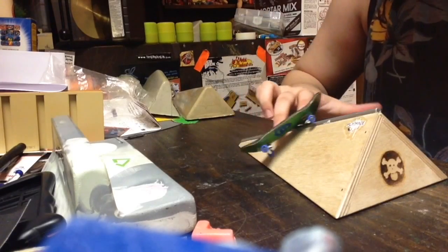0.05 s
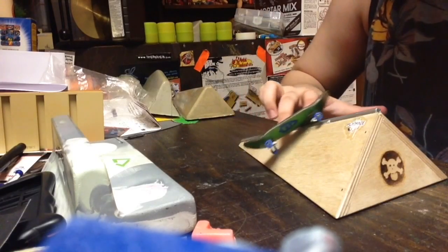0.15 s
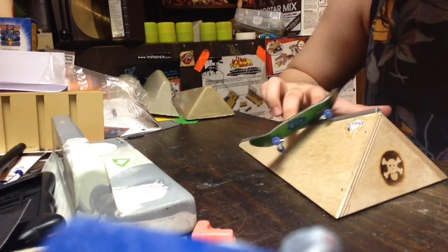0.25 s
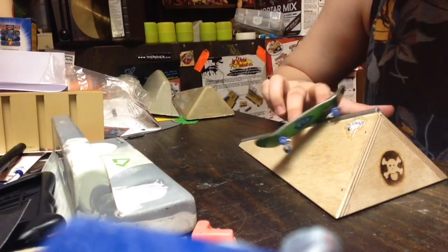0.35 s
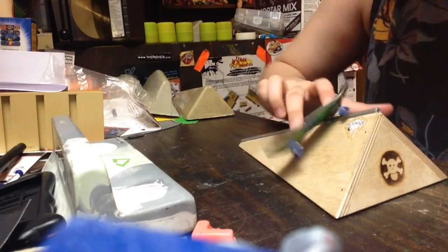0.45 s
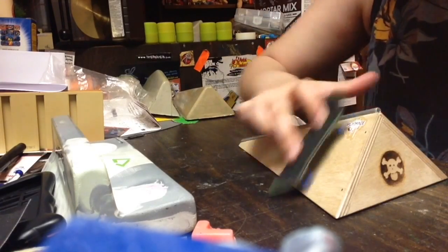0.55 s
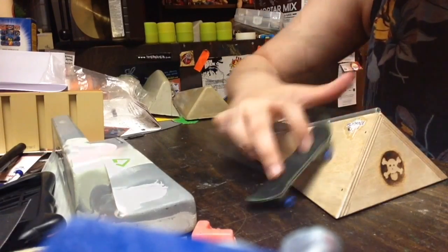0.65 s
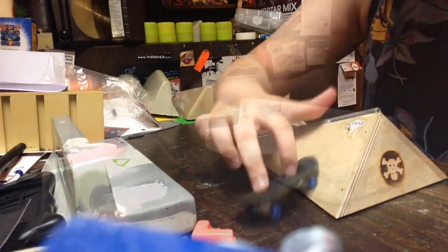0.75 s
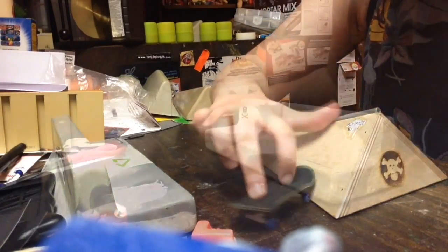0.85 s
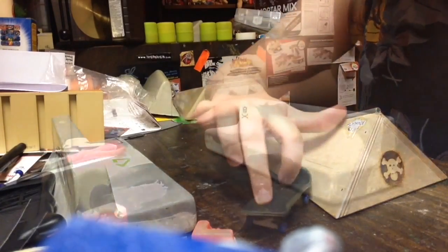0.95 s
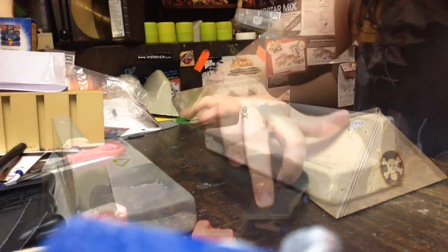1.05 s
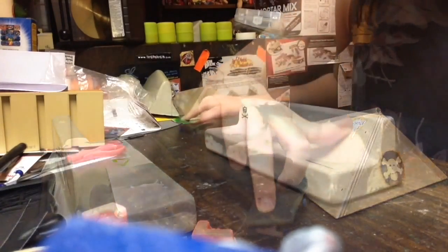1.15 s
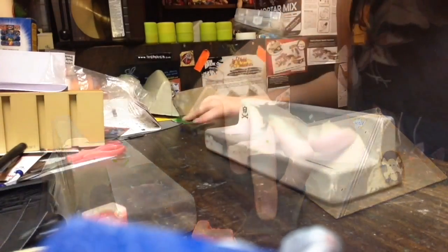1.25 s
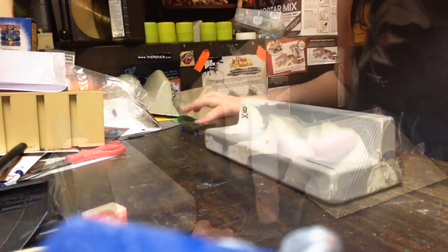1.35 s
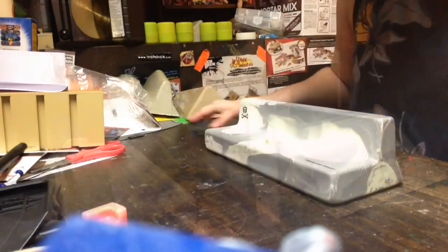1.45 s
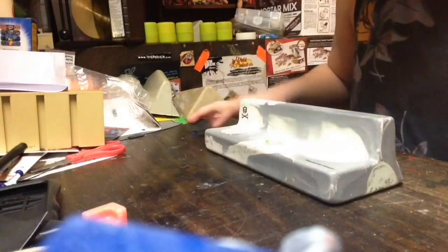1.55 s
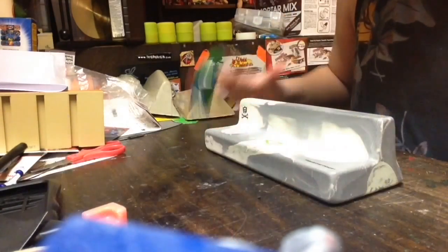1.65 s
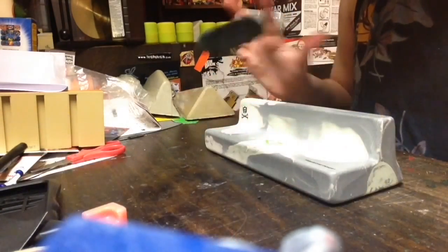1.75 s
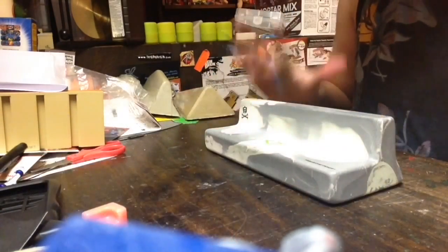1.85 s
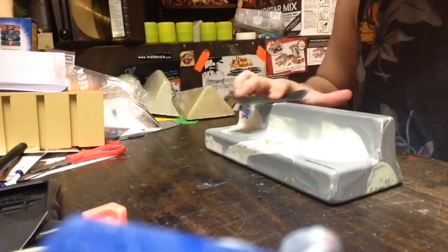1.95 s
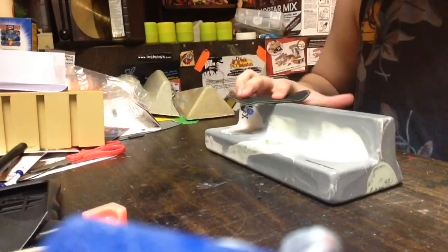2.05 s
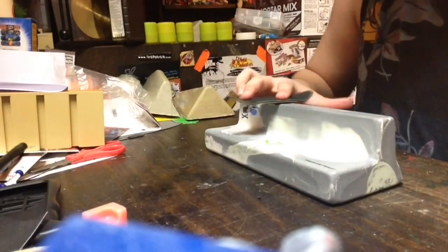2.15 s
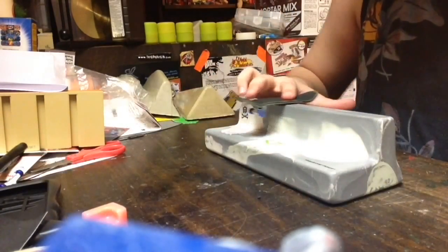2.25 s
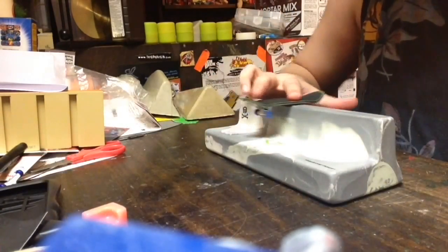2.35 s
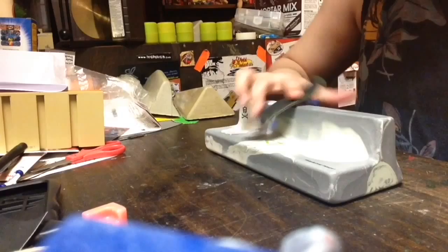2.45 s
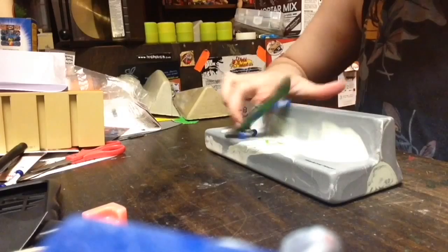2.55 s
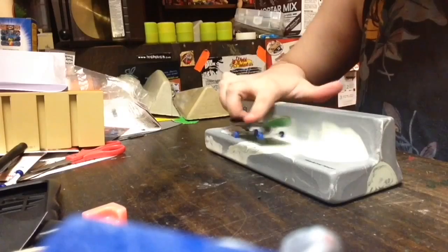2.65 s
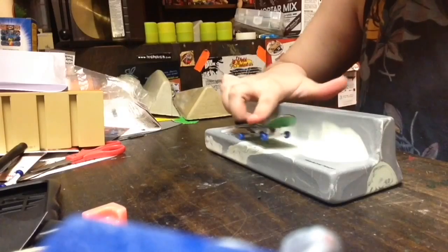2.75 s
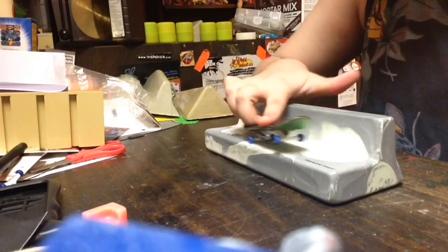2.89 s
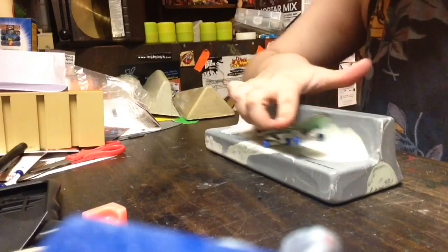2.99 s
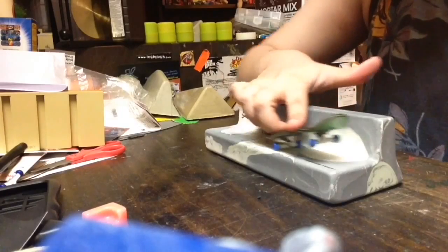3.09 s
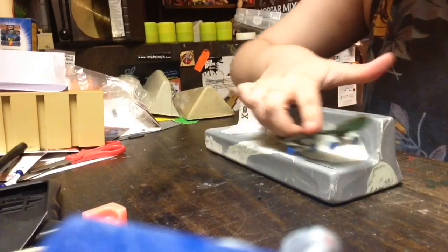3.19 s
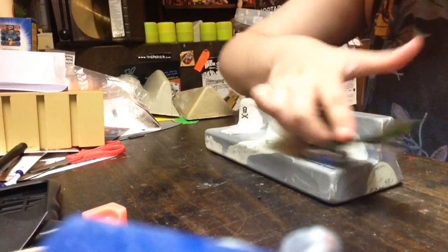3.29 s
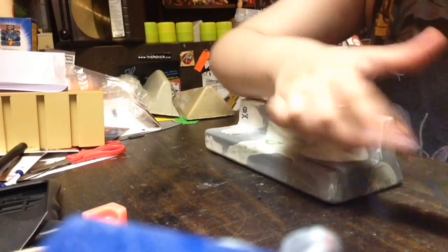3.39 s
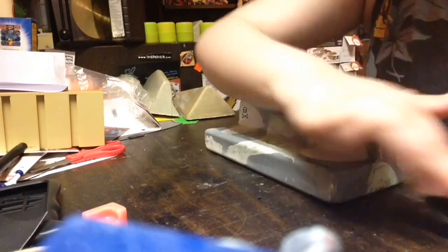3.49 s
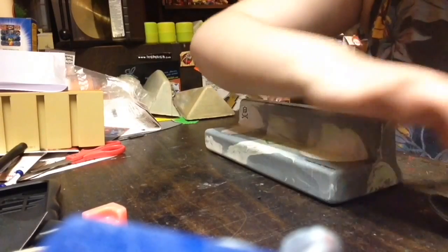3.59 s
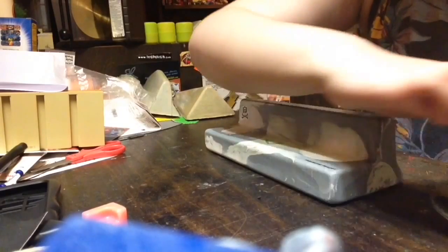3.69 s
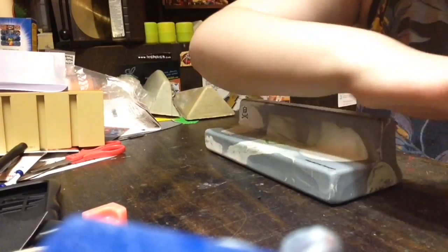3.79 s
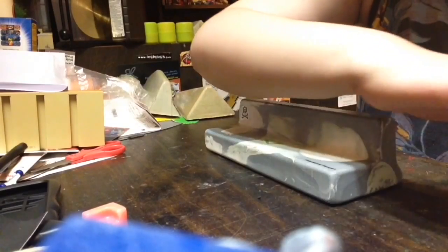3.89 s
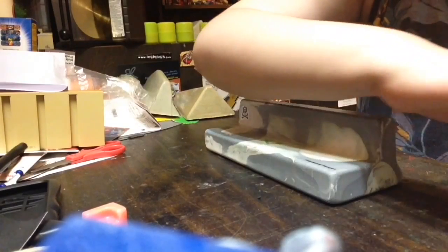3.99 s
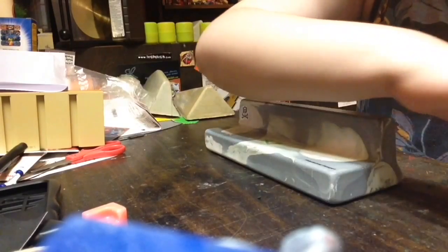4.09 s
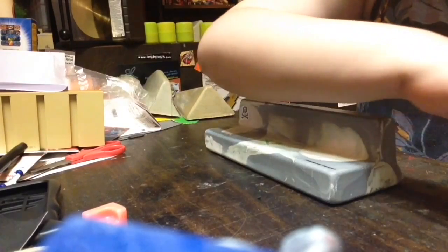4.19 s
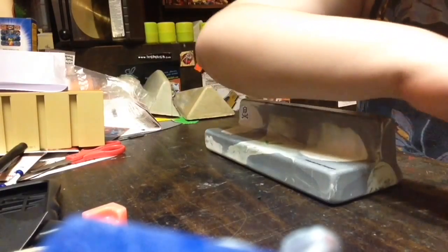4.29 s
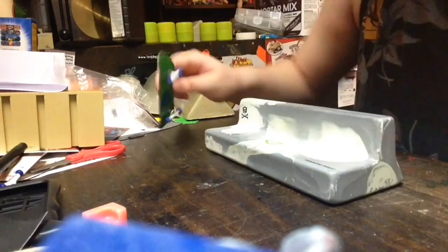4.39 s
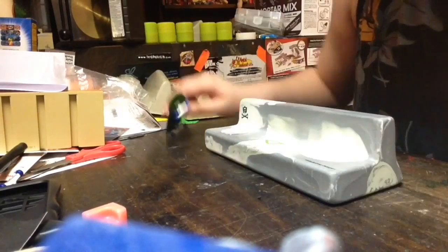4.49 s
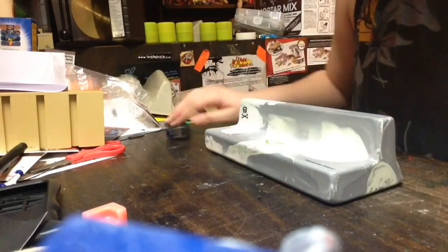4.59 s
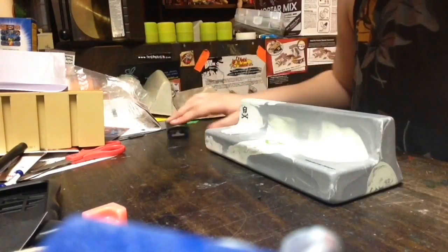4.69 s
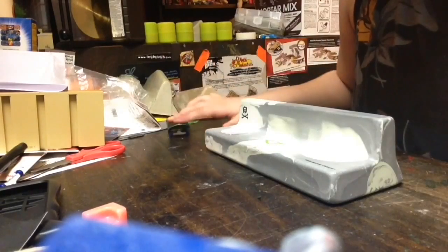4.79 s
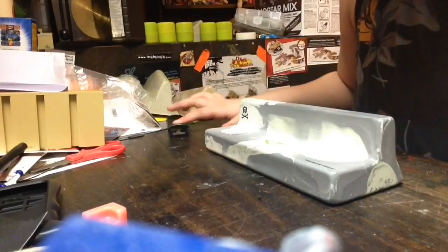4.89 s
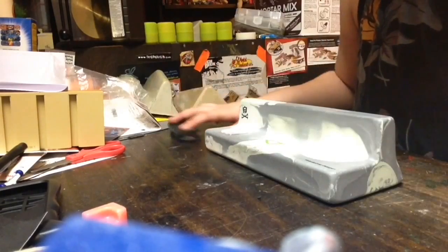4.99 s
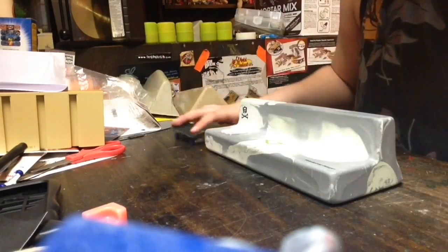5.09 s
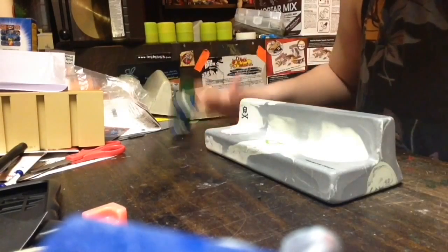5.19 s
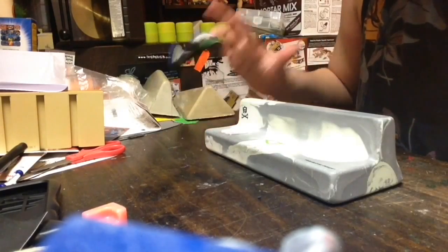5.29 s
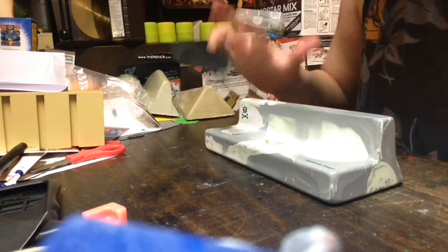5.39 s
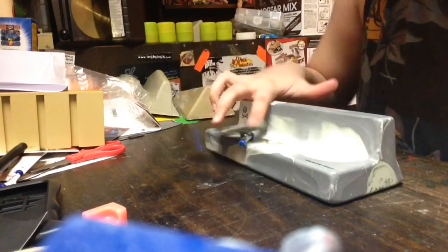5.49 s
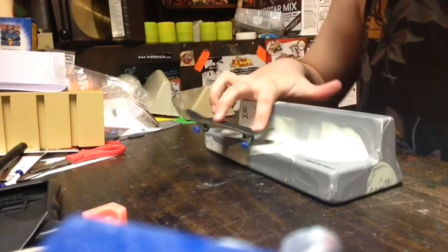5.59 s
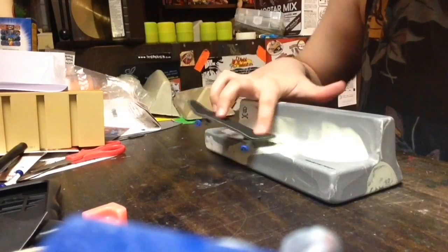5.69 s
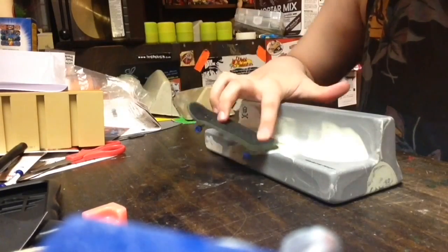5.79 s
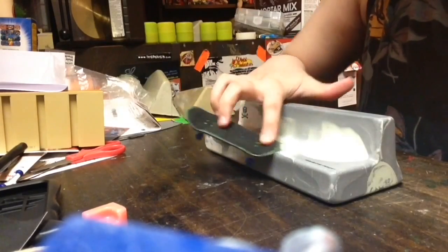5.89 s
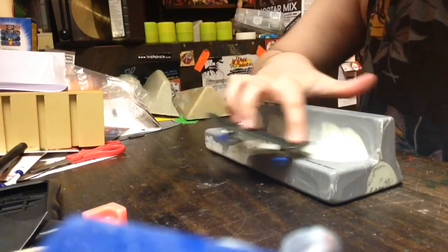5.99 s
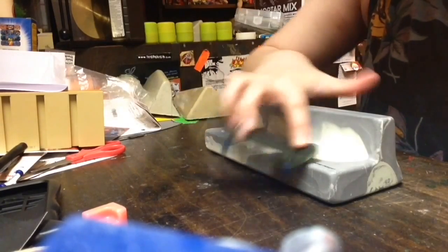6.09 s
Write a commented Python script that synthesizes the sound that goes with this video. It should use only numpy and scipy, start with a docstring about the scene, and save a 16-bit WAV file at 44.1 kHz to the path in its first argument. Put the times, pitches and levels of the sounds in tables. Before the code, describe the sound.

Tiny wheels rumble over a tabletop between hard clacks, metallic bench ticks, scraping grinds and one short squeak, all close up in a quiet room.

```python
"""A fingerboard strikes and scrapes wood and cast metal on a cluttered table, heard at close range.
It slides along a plywood pyramid and clatters down, then twice rolls up, pops onto a ringing bench,
grinds along its edge and drops off. Blows are noise bursts filtered by body resonances; the bench adds
decaying sines; rolling and grinding are grains of noise that swell with speed; one grind ends in a squeak.
A low room rumble lies underneath and dips after the loudest clacks."""
import sys
import numpy as np
from scipy import signal
from scipy.fft import rfft, irfft
from scipy.io import wavfile
from scipy.ndimage import uniform_filter1d

SR = 44100
rng = np.random.default_rng(int(sys.argv[2]) if len(sys.argv) > 2 else 0)


def transcribe(u):
    """Save the signal u as a 16-bit wav file named by the first command-line argument.

    u: samples, shape (n,) or (channels, n), limited to [-1, 1]; the rate is SR.
    q: integer samples, one column per channel.
    """
    v = np.clip(np.atleast_2d(u).T, -1, 1)
    q = np.round(v * 32767).astype(np.int16)
    wavfile.write(sys.argv[1], SR, q)


N = 270774  # samples
T = np.arange(SR // 2) / SR  # time axis of one decay, s
HZ = np.fft.rfftfreq(8192, 1 / SR) + 1  # frequency axis of all filters, Hz

# Blows of deck and wheels: t/s, surface, crack/dB, thud/dB, knock/dB, top/dB, clatter t60/s
HITS = [ (.4918, "ramp", -4, 1.5, -4, -3, 0.13), (.5592, "ramp", 4, 4, -1.5, -7, 0.1),
        (.5969, "ramp", -4, 2, -9, -5.5, 0.35), (.631, "ramp", -18, 9, -8, -30, 0.18),
        (.6692, "ramp", -12, -2, 1, -21, 0.5), (.758, "foot", -29, -14, -6.5, -35, 0.1),
        (.790, "foot", -22.5, 11.5, 4, -14.5, 0.089), (.843, "foot", -6.5, 3.5, -2, -21.5, 0.25),
        (.880, "foot", 1, 5, 4.5, -10.5, 0.11), (1.3666, "table", -30.5, -11, -20, -51, 0.27),
        (1.6132, "table", -1, 6.5, -2, -4.5, 0.13), (3.442, "edge", 14, 4.5, 7, 4, 0.21),
        (3.449, "edge", -13, 1, 5.5, 2.5, 0.19), (3.503, "edge", -21, 2, -9, -37, 0.15),
        (3.745, "side", -50.5, -26.5, -33, -50.5, .14), (4.042, "side", -44, -18, -33.5, -55, .15),
        (4.158, "side", -34.5, -10, -4.5, -51.5, .11), (4.3305, "table", -39, -29.5, -35, -50.5, .09),
        (4.4318, "table", -56, -23, -34.5, -58, 0.078), (4.555, "table", -7, -2, 2, -18, 0.18),
        (4.6158, "table", -6, 2.5, -7, -22.5, 0.17), (4.6405, "table", 13.5, 8.5, 9, 8, 0.11),
        (4.8858, "table", -55, -16, -31, -60.5, 0.072), (4.9571, "table", -47, -7, -22, -43, 0.3),
        (4.996, "table", -39, -4.5, -16.5, -56.5, 0.15), (5.2097, "table", -5.5, 6, -3.5, -11.5, 0.11)]
# Trucks striking the bench: t/s, crack/dB, thud/dB, knock/dB, top/dB, clatter t60/s,
# backrest ring/dB, seat ring/dB
BENCH_HITS = [ (1.861, -34, -29.5, -31, -44, .12, -76.5, -80.5), (1.891, 1, -9, 0, 2, 0.069, -50, -54),
              (1.898, 2.5, -7, 1, 2.5, .07, -43.5, -51), (1.904, 10, -11, 7, 12, .092, -36.5, -31.5),
              (1.936, -7.5, -6.5, -2, -18.5, 0.1, -27.5, -55.5),
              (2.473, -48, -34.5, -34, -50, 0.42, -64.5, -82),
              (2.513, -10.5, -20, -12, -17, 0.23, -56.5, -62), (2.5293, 7, -2, -2.5, 7, .12, -33.5, -47),
              (5.436, -34, -38, -28, -44, 0.19, -79, -86.5),
              (5.489, -10.5, -17, -13.5, -3, .05, -63.5, -49), (5.493, 12.5, 4.5, 3, 6.5, 0.096, -55, -8.5),
              (5.524, 1, -6, -1, 1.5, 0.13, -44, -39.5), (5.872, -13.5, -25, -21.5, -20.5, 0.085, -58, -65)]
# Bands of a blow, in the order crack, thud, knock, top: lower f/Hz, upper f/Hz
HIT_BANDS = [(3000, 7000), (130, 700), (700, 3000), (7000, 15500)]
# Band of the low thump under a blow: lower f/Hz, upper f/Hz
THUMP_BAND = (55, 120)

# Resonances of the struck bodies, all with columns: f/Hz, width/Hz (at -6 dB), lift/dB
# plywood pyramid
RAMP_BODY = [(187.3, 12, 18), (287, 98, 15.5), (403, 59, 15.5), (540, 120, 8.5), (681.5, 200, 10),
             (1260, 370, 14.5), (1620, 130, 0), (3690, 350, 15), (4500, 2000, 12.5)]
# table at the foot of the pyramid
FOOT_BODY = [(176, 29, 19), (240, 54, 16.5), (295, 98, 20.5), (413, 77, 10.5), (590, 126, -0.5),
             (715, 110, 15.5), (825, 410, 18), (1120, 37, 23.5), (1275, 200, 16), (1660, 53, 11.5),
             (2070, 81, 7), (3070, 1400, 7), (4020, 370, 13), (4870, 1200, 10), (13900, 900, 11)]
# tabletop
TABLE_BODY = [(187, 32, 7.9), (247, 70, 14), (405, 57, 7), (551.2, 38, 11), (650, 110, 5.5), (877, 230, 13),
              (1125, 150, 13), (1300, 410, 8.6), (1660, 80, 9.5), (2000, 550, 2), (2378, 190, 2.3),
              (2910, 580, 6.1), (4820, 550, 2.7), (6600, 230, 0.8)]
# edge
EDGE_BODY = [(187.2, 120, 13), (439.3, 100, 15.5), (567, 59, 4.5), (778, 49, 20), (1071, 130, 17),
             (1522, 45, 4.1), (2024, 280, 16), (2432, 480, 7.9), (4437, 600, 6.1), (5220, 350, 8)]
# far side of the table
SIDE_BODY = [(253, 31, 6.5), (445, 66, 15.5), (533, 65, 12.5), (655, 39, 12), (790, 190, 26),
             (1146, 120, 18.5), (1380, 230, 19), (1760, 560, 8.5), (2240, 200, -2), (3350, 240, -6),
             (4730, 1100, 13)]
# cast bench
BENCH_BODY = [(151, 12, 27), (189, 130, 18), (340, 70, 6.7), (550, 32, 5.5), (816, 33, 2.3), (1420, 49, 2),
              (1720, 150, 4.6), (2695, 150, 14), (3280, 210, 2), (5440, 250, 5), (10400, 1900, 5),
              (12700, 800, 6)]
# Ringing modes of the bench: f/Hz, t60/s, level struck on the backrest/dB, level struck on the seat/dB
BENCH_MODES = [ (2299, .28, -8, -45), (2627, .1, -16, -2), (2750, .07, -4, -22), (3575, .3, -4, -45),
               (4958, .15, -22, -11), (5525, .09, -18, -3), (5620, .17, -10, -12), (6050, .17, -22, -13),
               (6406, .2, -8, -24), (6896, .17, -28, -18), (7825, .15, -13, -12), (7980, .17, -13, -28),
               (8899, .16, -24, -23), (9816, .11, -15, -10), (9986, .13, -16, -13), (11550, .08, -6, -22),
               (12387, .1, -13, 0), (12823, .09, -12, -8), (12963, .1, -18, -4), (13274, .14, -22, -11),
               (14320, .1, -22, -11)]

# Friction strokes, all with columns: t/s, length/s, time to top speed/s, swell width/s, level/dB, brightness/dB
# trucks sliding down the plywood edge
RAMP_SLIDE = [(0.0014, 0.57, 0.43, 0.36, -55, 1.45)]
# trucks grinding on the bench's backrest
BACKREST_GRINDS = [(2.16, 0.17, 0.077, .08, -74.5, 4.5), (2.68, .7, .42, 0.3, -58.5, 2),
                   (3.255, .155, .07, 0.081, -59, 15)]
# trucks grinding on the bench's seat
SEAT_GRINDS = [(5.9, 0.21, 0.13, 0.036, -59, 0)]
# wheels rolling down the plywood pyramid and on the table
ROLLS = [(.565, .185, 0.05, 0.1, -35.5, 3), (.748, 0.071, .035, 0.035, -34.5, 6),
         (.81, .23, 0.068, 0.21, -38, -6.5), (1.04, 0.35, 0.17, 0.37, -52.5, -6),
         (1.37, 0.25, 0.1, 0.06, -30, -0.5), (3.48, 0.092, 0.02, 0.041, -31.5, -1.5),
         (4.56, 0.36, 0.084, 0.13, -36, -7.5), (4.955, 0.25, 0.1, 0.072, -27.5, 0)]
# board drawn along the far side of the table
DRAGS = [(3.73, .23, 0.12, 0.1, -56, 1), (3.98, .18, 0.14, 0.1, -49.5, -1),
         (4.33, 0.14, .06, 0.11, -60, 5.5)]
# Bands of friction, in the order rumble, whirr, hiss: lower f/Hz, upper f/Hz
RUB_BANDS = [(150, 900), (900, 3000), (3000, 15500)]

# Relative spectra of friction and of the room, all with columns: f/Hz, level/dB
# trucks on plywood
SLIDE_COLOUR = [(120, -20), (200, -35), (315, 7.5), (399, -10), (515, -10), (1010, -10.5), (1710, -0.5),
                (1880, -4), (2600, -9), (3420, -21), (5150, -22), (5490, -35), (6710, -36.5),
                (10000, -29.5), (15500, -42)]
# trucks on the bench
GRIND_COLOUR = [(240, -34.5), (400, -15), (542, 3), (660, -0.5), (816, 6.5), (979, -0.5), (1910, -15),
                (2700, -3.5), (3290, -5), (4300, -9), (5200, -21.5), (6420, -29), (7810, -19.5),
                (9300, -27.5), (15000, -43)]
# wheels on the tabletop
ROLL_COLOUR = [(100, -41), (180, -6.5), (300, 1.5), (520, 6), (880, -0.5), (1300, -4.5), (2500, -4.5),
               (4900, -6.5), (6500, -28), (10000, -35), (15000, -47)]
# room rumble
ROOM_COLOUR = [(15, -55.5), (25, -35), (91, -24.5), (215, -6.5), (359, -9), (598, -18), (722, -17.5),
               (1300, -22.5), (1900, -34.5), (3100, -28.5), (4200, -36.5), (5010, -40.5), (15500, -43.5)]


def blows():
    """Impact excitation: each pop or landing is coloured by the resonances of the surface it strikes."""
    surfaces = {
        "ramp": dict(resonances=RAMP_BODY, top_tilt_db=-9.5, snap_db=13.5),
        "foot": dict(resonances=FOOT_BODY, top_tilt_db=-20, snap_db=11),
        "table": dict(resonances=TABLE_BODY, top_tilt_db=-10.0, snap_db=6.5),
        "edge": dict(resonances=EDGE_BODY, top_tilt_db=-5.0, snap_db=17.5, thump_db=-18.5),
        "side": dict(resonances=SIDE_BODY, top_tilt_db=-8.5, snap_db=6.5)}
    out = np.zeros(N)
    for start, surface, *row in HITS:
        add(out, start, blow(row, **surfaces[surface]))
    for start, *row, _, _ in BENCH_HITS:
        add(out, start, blow(row, BENCH_BODY, top_tilt_db=-3.5, snap_db=0.8, thump_db=-8.5))
    return out


def blow(row, resonances, top_tilt_db, snap_db, thump_db=-6.5):
    """Source-filter principle: hardness shares the contact's energy between crack, thud, knock and top."""
    *levels_db, t60 = row
    treble_tilt = spectrum([(7000, 0.0016), (15000, top_tilt_db)])
    ring = body(resonances) * treble_tilt * deck_ripple()
    shapes = np.array([unit(ring * band(lo, hi)) for lo, hi in HIT_BANDS])
    # The push of the hand into the table follows the crack level
    shapes[0] += amp(thump_db) * band(*THUMP_BAND, order=5)
    gain = np.linalg.norm(amp(levels_db)[:, None] * shapes, axis=0)
    return colour(clatter(t60, snap_db), gain)


def clatter(t60, snap_db, snap_t60=0.047, echo_s=0.0082, echo_db=-1, room_db=-20, room_t60=.23,
            tick_db=-10, rise_s=0.00071, smooth_bins=70):
    """Superposed decays, flat in spectrum: tick, snap, echo off the shelves, scatter from clutter, room."""
    snap = dying(snap_t60) ** 2
    echo = np.interp(T - echo_s, T, snap, left=0)
    scatter = dying(t60) ** 2
    reverb = (amp(room_db) * dying(room_t60)) ** 2
    power = amp(snap_db) ** 2 * snap + amp(echo_db) ** 2 * echo + scatter + reverb
    burst = np.sqrt(power) * np.minimum(T / rise_s, 1) * rng.standard_normal(len(T))
    z = rfft(burst)
    flat = irfft(z / np.sqrt(uniform_filter1d(abs(z) ** 2, smooth_bins)), len(T))
    flat[SR // 1000] += amp(tick_db)
    fade = np.minimum(1, 2 - 2 * T / T[-1]) ** 2
    return flat * fade


def deck_ripple(smooth_bins=45):
    """Modal density: every contact point stirs a different mix of the deck's crowded upper modes."""
    noise = uniform_filter1d(rng.standard_normal(len(HZ)), smooth_bins)
    peaks = unit(uniform_filter1d(noise, smooth_bins))
    return amp(2.5 * peaks * band(1500, SR, order=4))


def bench_ring(rise_s=.002):
    """Modal excitation: the cast bench rings on, and the spot struck decides which modes answer."""
    out = np.zeros(N)
    modes = bench_modes()
    _, _, back_db, seat_db = np.transpose(BENCH_MODES)
    for start, *_, back, seat in BENCH_HITS:
        strengths = np.hypot(amp(back + back_db), amp(seat + seat_db))
        add(out, start, strengths @ modes * (1 - np.exp(-T / rise_s)))
    return out


def bench_modes():
    """Free damped vibration: one dying sine for each mode, at random phase."""
    return np.array([dying(t60) * np.sin(2 * np.pi * (hz * T + rng.random()))
                     for hz, t60, _, _ in BENCH_MODES])


def grinds(mode_width_hz=30, mode_lift_db=12):
    """Sliding friction: metal trucks hiss along the plywood edge and make the bench sing faintly."""
    wood = friction(RAMP_SLIDE, spectrum(SLIDE_COLOUR), whirr_db=-1.4, hiss_db=-2.0,
                    swell_db=5, treble_swell_db=8, grit_share=.8, bumps_per_s=250)
    mode_peaks = [(hz, mode_width_hz, mode_lift_db + max(back, seat) / 4) for hz, _, back, seat in BENCH_MODES]
    gain = spectrum(GRIND_COLOUR) * body(mode_peaks)
    backrest = friction(BACKREST_GRINDS, gain, whirr_db=-4.0, hiss_db=-5.5, swell_db=12.5, treble_swell_db=11.5)
    seat = friction(SEAT_GRINDS, gain, whirr_db=10, hiss_db=9, swell_db=16, treble_swell_db=13)
    _, _, back_db, seat_db = np.transpose(BENCH_MODES)
    singing = sing(backrest, back_db, level_db=-41.5) + sing(seat, seat_db, level_db=-32)
    return wood + backrest + seat + singing


def sing(scrape, modes_db, level_db, wander_db=7, shifts_per_s=18):
    """Resonant storage: modes hold a scrape; as the truck moves, now one answers and now another."""
    out = np.zeros(N)
    t = np.arange(N) / SR
    for (hz, t60, _, _), db in zip(BENCH_MODES, modes_db):
        strengths = amp(db + wander_db * rng.standard_normal(256))
        contact = np.interp(t * shifts_per_s, np.arange(256), strengths)
        r = np.exp(-np.log(1000) / (t60 * SR))
        angle = 2 * np.pi * hz / SR
        drive = scrape * contact + 1e-18
        out += t60 * signal.lfilter([0, np.sin(angle)], [1, -2 * r * np.cos(angle), r * r], drive)
    return amp(level_db) * out


def squeal(centre_s=3.353, width_s=.022, level_db=-47, hz=2720, width_hz=380, ring_db=-43, rise_s=0.014):
    """Narrow-band friction: a truck squeaks as the long grind ends; the bench's longest mode sounds on."""
    swell = np.exp(-((np.arange(N) / SR - centre_s) / width_s) ** 2)
    gain = 1 / (1 + (2 * (HZ - hz) / width_hz) ** 4)
    out = amp(level_db) * swell * unit(colour(rng.standard_normal(N), gain))
    ring_hz, t60, _, _ = max(BENCH_MODES, key=lambda mode: mode[1])
    ring = np.minimum(T / rise_s, 1) * dying(t60) * np.sin(2 * np.pi * ring_hz * T)
    add(out, centre_s, amp(ring_db) * ring)
    return out


def wheels():
    """Roughness excitation: small hard wheels drum the grain of the wood they roll on."""
    gain = spectrum(ROLL_COLOUR) * body(TABLE_BODY)
    near = friction(ROLLS, gain, whirr_db=-3.0, hiss_db=-9.5, swell_db=17, treble_swell_db=29.5,
                    grit_db=18.5, grit_share=.8, bumps_per_s=460)
    far = friction(DRAGS, gain, whirr_db=-14, hiss_db=-15.5, swell_db=10, treble_swell_db=8.5,
                   edge_s=0.016, grit_share=0.59, bumps_per_s=130)
    return near + far


def friction(strokes, gain, whirr_db, hiss_db, swell_db, treble_swell_db, whirr_share=0.5, edge_s=.012,
             grit_db=14, grit_share=0.52, bumps_per_s=600, judder_db=2):
    """Random excitation: tiny bumps drive a body, and each band swells with speed by its own amount."""
    out = np.zeros(N)
    for start, length, fastest, width, level_db, bright_db in strokes:
        t = np.arange(0, length, 1 / SR)
        fine, sign, sway = rng.standard_normal((3, SR))[:, :len(t)]
        chance, height = rng.random((2, SR))[:, :len(t)]
        bumps = np.sign(sign) * (chance < bumps_per_s / SR) * amp(grit_db * height ** 2)
        pressure = amp(judder_db * unit(uniform_filter1d(sway, size=400)))
        drive = (fine + grit_share * unit(bumps)) * pressure
        # The clutter smears the grains
        drive = signal.fftconvolve(drive, clatter(t60=0.15, snap_db=-3.0))[:len(t)]
        fade = np.clip(np.minimum(t, length - t) / edge_s, 0, 1)
        slowness = 1 - np.exp(-((t - fastest) / width) ** 2)
        rumble = -swell_db * slowness
        whirr = whirr_db + whirr_share * bright_db - (swell_db + treble_swell_db) / 2 * slowness
        hiss = hiss_db + bright_db - treble_swell_db * slowness
        for (lo, hi), db in zip(RUB_BANDS, (rumble, whirr, hiss)):
            add(out, start, fade * amp(level_db + db) * unit(colour(drive, gain * band(lo, hi))))
    return out


def room(level_db=-55.5):
    """Room modes: a steady low rumble of noise with a few soft resonances."""
    gain = spectrum(ROOM_COLOUR) * body([(181, 43, 8.8), (243, 22, 2.7), (343, 22, 7.5), (570, 97, 3.3)])
    return amp(level_db) * unit(colour(rng.standard_normal(N), gain))


def amp(db):
    """Logarithmic level: decibels to amplitude gain."""
    return 10 ** (np.asarray(db) / 20)


def unit(x):
    """Normalisation: scales to rms 1."""
    return x / np.sqrt(np.mean(x ** 2) + 1e-20)


def add(mix, start_s, sound):
    """Superposition: mixes a sound in at a time."""
    part = mix[max(round(start_s * SR), 0):][:len(sound)]
    part += sound[:len(part)]


def spectrum(points):
    """Spectral envelope: gain over HZ, its level interpolated along log frequency."""
    hz, db = np.transpose(points)
    return amp(np.interp(np.log(HZ), np.log(hz), db))


def body(resonances):
    """Resonance: gain over HZ of peaks whose powers add to a flat response."""
    power = 1
    for hz, width, db in resonances:
        power = power + amp(db) ** 2 / (1 + (2 * (HZ - hz) / width) ** 2) ** 2
    return np.sqrt(power)


def band(lo, hi, order=18):
    """Band-pass response: gain over HZ of a band with soft edges."""
    return 1 / np.sqrt((1 + (lo / HZ) ** order) * (1 + (HZ / hi) ** order))


def colour(x, gain):
    """Minimum phase: a causal filter whose phase follows from its gain over HZ."""
    log_gain = np.log(np.maximum(np.r_[gain, gain[-2:0:-1]], 1e-6))
    response = np.exp(np.conj(signal.hilbert(log_gain)))[:len(HZ)]
    taps = irfft(response)[:len(HZ) // 2]
    return signal.fftconvolve(x, taps)[:len(x)]


def dying(t60):
    """Exponential decay: an amplitude that falls 60 dB in t60 (at least 5 ms)."""
    return np.exp(-np.log(1000) * T / max(t60, .005))


def ducking(dry, above_db=-22.5, share=0.25, attack_s=0.15, recover_db_per_s=20):
    """Automatic gain control: gain falls by a share of the excess after loud peaks and creeps back."""
    power_db = 10 * np.log10(abs(uniform_filter1d(dry[0] ** 2, size=400)) + 1e-12)
    recovery = recover_db_per_s * np.arange(N) / SR
    held_db = np.maximum.accumulate(power_db + recovery) - recovery
    over_db = np.maximum(held_db - above_db, 0)
    r = np.exp(-1 / (attack_s * SR))
    return amp(-share * signal.lfilter([1 - r], [1, -r], over_db))


def scene():
    """Superposition of blows, ringing, grinding, squeak, rolling and room, as one channel."""
    return (blows() + bench_ring() + grinds() + squeal() + wheels() + room())[None]


def record(dry):
    """Level and band limits: gain control, a brief dropout, clipped peaks and a low-pass at 15450 Hz."""
    dropout = np.interp(np.arange(N) / SR, [4.447, 4.451, 4.473, 4.484], [1, .02, .02, 1])
    limited = np.clip(dry * ducking(dry) * dropout, -1, 1)
    low_pass = signal.firwin(255, 15450, window=("kaiser", 8), fs=SR)
    return signal.oaconvolve(limited, low_pass[None], "same")


dry = scene()
out = record(dry)
transcribe(out)
```